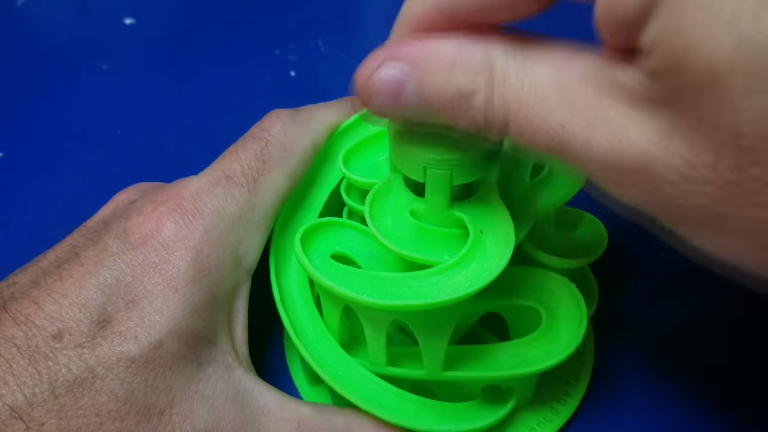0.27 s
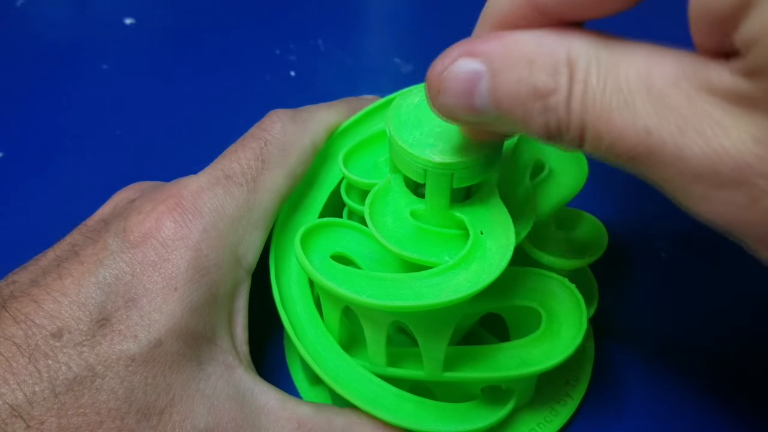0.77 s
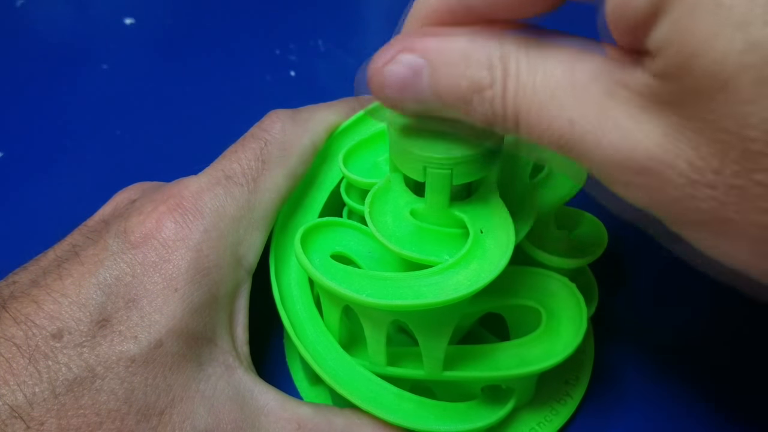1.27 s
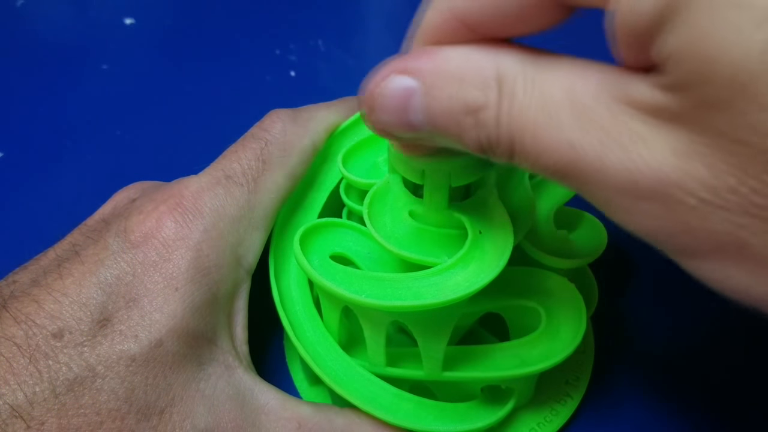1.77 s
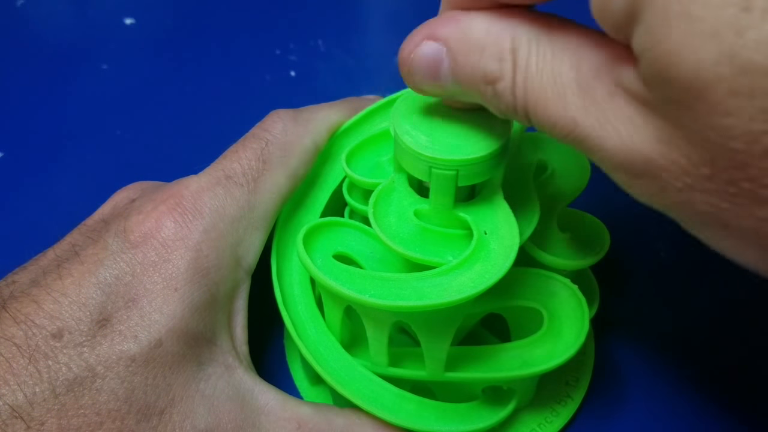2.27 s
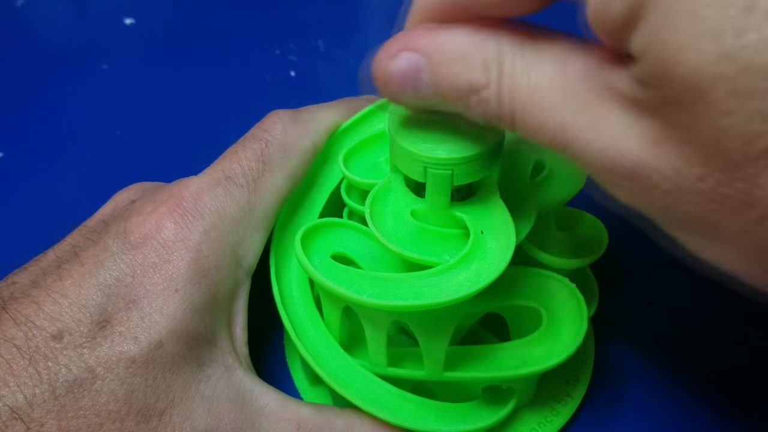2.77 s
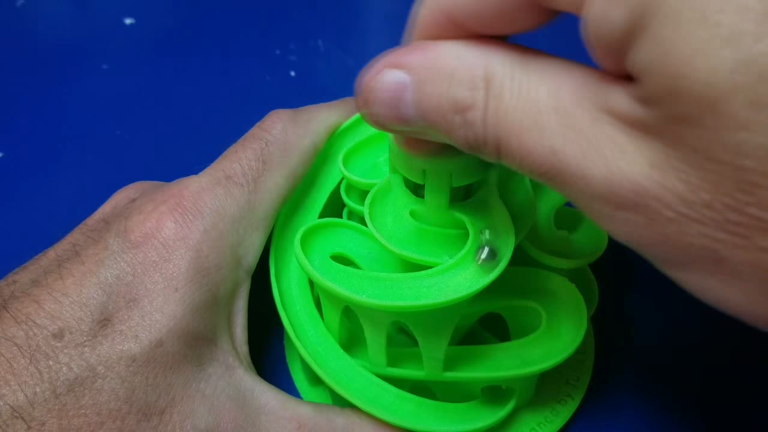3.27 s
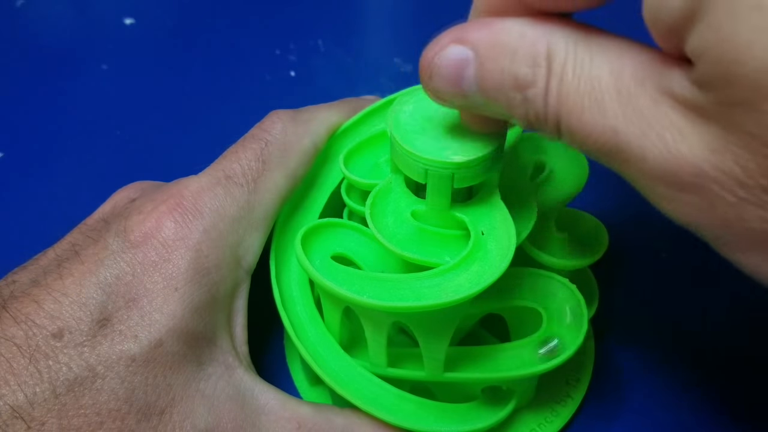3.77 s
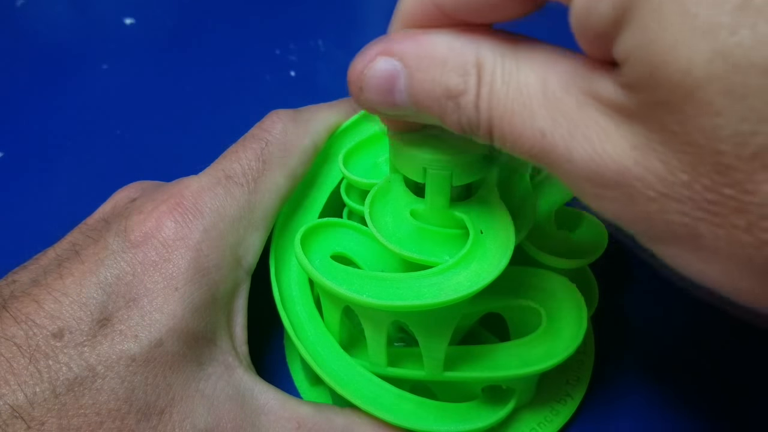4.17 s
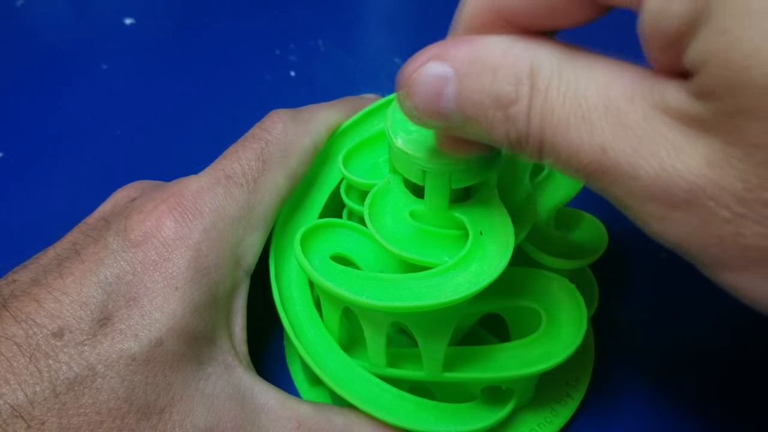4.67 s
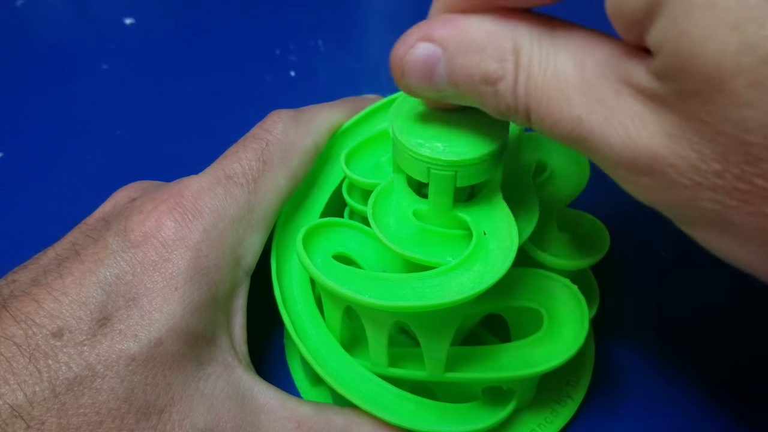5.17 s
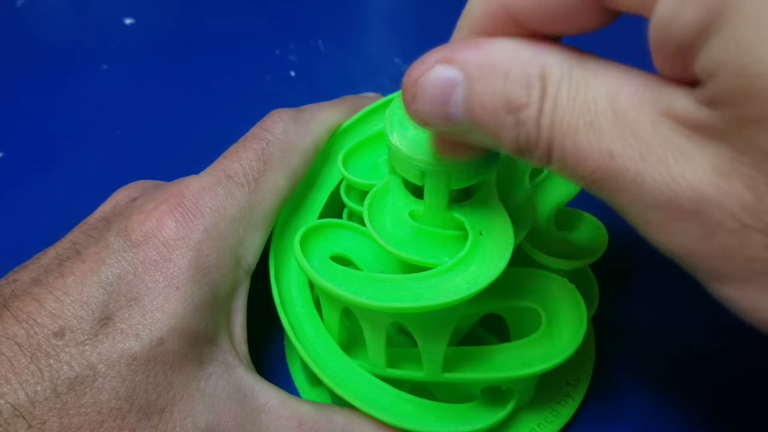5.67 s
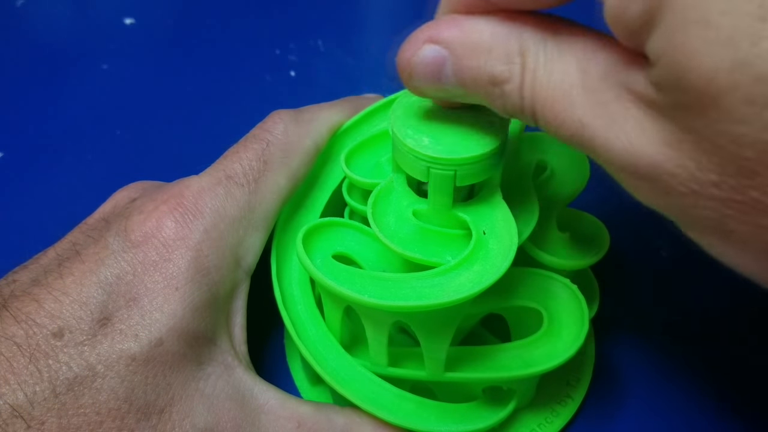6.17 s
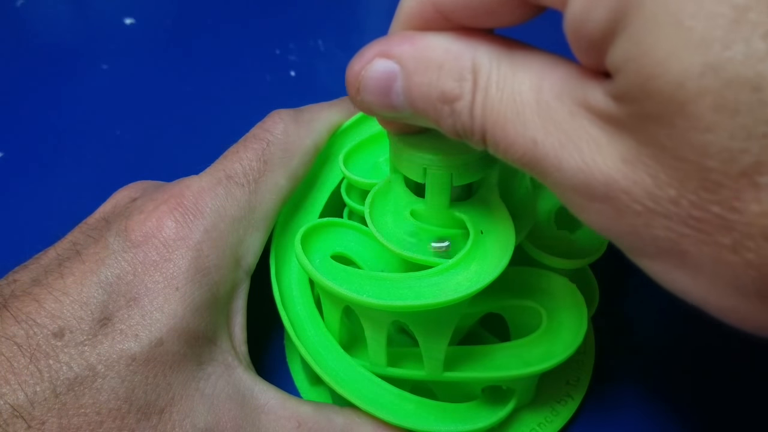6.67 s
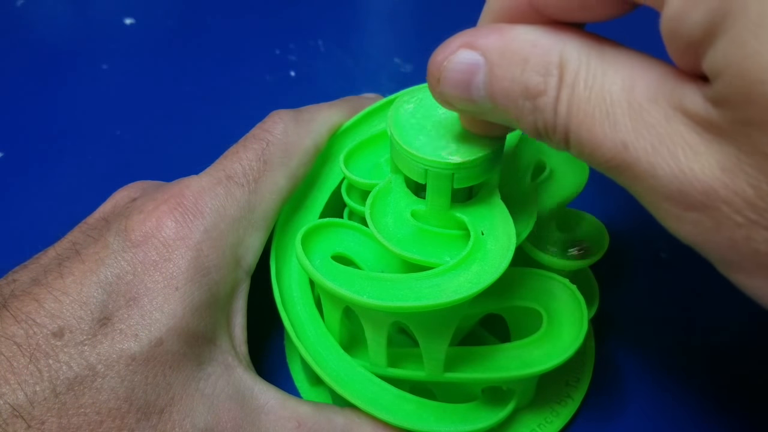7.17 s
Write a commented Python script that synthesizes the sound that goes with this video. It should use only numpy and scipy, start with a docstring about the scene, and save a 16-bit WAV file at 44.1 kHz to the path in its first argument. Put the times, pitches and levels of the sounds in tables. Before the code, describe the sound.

Close up in a quiet, humming room, a hand-turned plastic knob scrapes and clicks. A small steel ball soon ticks down a ridged track and bounces to rest. Irregular snapping clicks and soft table thuds follow, then a second ball runs longer, ending in hard rattling knocks. More rubs and clicks lead to a third ball, still rolling at the end.

```python
"""A small printed plastic marble machine is held on a table in a humming room; its knob is turned by hand.
The lift screw rubs and clicks, then a first steel ball ticks down the ridged track, knocks and bounces to rest.
The screw works on, sticking and snapping free, until a second ball runs down and rattles in the bottom channel.
More rubs and clicks follow, and a third ball closes the scene; soft thuds on the table fall between the runs.
Every contact rings a set of plastic tones plus short noise; ridges and scrapes are streams of tiny contacts."""
import sys
import numpy as np
from scipy import signal
from scipy.fft import rfft, irfft
from scipy.io import wavfile
from scipy.ndimage import uniform_filter1d

SR = 44100
rng = np.random.default_rng(int(sys.argv[2]) if len(sys.argv) > 2 else 0)


def wav_record(signal):
    """Record a signal, one row per channel, as 16-bit PCM in the file named by sys.argv[1]."""
    frames = np.transpose(np.atleast_2d(signal))
    bounded = np.clip(frames, -1, 1)
    # unit amplitude maps onto the largest positive 16-bit level
    quanta = np.round(bounded * 32767).astype(np.int16)
    wavfile.write(sys.argv[1], SR, quanta)


N = 327210
TIME = np.arange(N) / SR  # [s]

# Room air, its relative spectrum: (frequency [Hz], level per Hz [dB])
AIR_SPECTRUM = [(15, -40), (25, -6.5), (229, -6), (335, -5.5), (439, -10), (863, -17.5), (962, -17.5),
                (2110, -24), (2690, -28.5), (4030, -34.5), (5280, -40.5), (16000, -30.5)]
# How alike the air is on the left and right: (frequency [Hz], likeness [0-1])
AIR_LIKENESS = [(60, 0.93), (250, 0.87), (500, 0.72), (1500, 0.039), (12000, 0.04)]
# Tones of the hum, before wavering and panning: (frequency [Hz], level [dB])
HUM_TONES = [(58.3, -64), (119.5, -64), (220.7, -64), (240, -66), (289, -65.5), (380, -70), (436, -64)]
# Colour of the room's reflections: (frequency [Hz], relative level per Hz [dB])
WALL_COLOUR = [(200, 12.5), (3500, 3.5), (8000, 0.5), (16000, 6.5)]

# The toy bumps on the table: (time [s], starting gain [dB])
TABLE_BUMPS = [(1.782, -53), (1.912, -49.5), (2.217, -50.5), (4.827, -52.5), (5.634, -42.5), (6.343, -55)]
# Colour of the dull knock in a bump: (frequency [Hz], relative level per Hz [dB])
BASE_COLOUR = [(30, -35), (60, -17), (100, 5.5), (230, 0), (450, -5.5), (800, -16.5), (1500, -30)]

# The screw rubs in its tower with each push of the fingers: (start [s], length [s], gain [dB])
SCREW_RUBS = [(0.023, 0.08, -54), (0.926, 0.033, -50.5), (1.135, 0.21, -58.5), (1.549, 0.22, -55),
              (1.903, 0.037, -45), (2.075, 0.029, -42.5), (2.368, 0.046, -51.5), (2.476, 0.14, -54),
              (2.593, 0.18, -50), (2.876, 0.064, -54.5), (3.031, 0.075, -56.5), (4.26, 0.41, -62),
              (4.689, 0.097, -55), (4.821, 0.049, -48), (4.887, 0.14, -58.5), (5.12, 0.071, -56),
              (5.646, 0.12, -55.5), (5.845, 0.06, -53), (5.944, 0.081, -55), (6.083, 0.065, -52.5),
              (6.163, 0.13, -55), (6.303, 0.3, -58.5), (6.503, 0.16, -54.5)]
# The screw catches and lets go; low ring and treble are relative to the strength:
# (time [s], strength [dB], low ring [dB], treble [dB])
SCREW_CLICKS = [(0.069, -40, -4, -12), (0.264, -38.5, -12, -23), (0.275, -49, -10, -2.5),
                (0.928, -39.5, -24, -11.5), (1.073, -42, -4.5, -11), (1.108, -57, -1, -3.5),
                (1.249, -29, -18.5, -14.5), (1.256, -42, -15, -6), (1.345, -32.5, -18, -13.5),
                (1.37, -37.5, -23, -15), (1.414, -31.5, -15, -13.5), (1.483, -38, -12.5, -21),
                (1.579, -35.5, -29, -17.5), (1.615, -32, -39, -18), (1.715, -31.5, -20, -18),
                (1.74, -36.5, -19, -16), (1.783, -30.5, -10, -6), (1.785, -34, -10, -5.5),
                (1.911, -24, -18, -12.5), (1.916, -23.5, -27.5, -16), (1.928, -28, -23, -14.5),
                (2.077, -41, -8, -14), (2.087, -27, -25, -14), (2.093, -29.5, -35, -15),
                (2.134, -35.5, -11, -15.5), (2.216, -30.5, -8, -9), (2.233, -30.5, -24, -25),
                (2.269, -31.5, -17, -25), (2.286, -41, -4, -12.5), (2.383, -42, -7, -5.5),
                (2.503, -34, -16.5, -27), (2.525, -26.5, -20, -12), (2.552, -36, -14, -22),
                (2.651, -31, -18, -22), (2.677, -32, -32, -24), (2.686, -26.5, -18, -21),
                (2.729, -40.5, -12, -5.5), (2.92, -52, 6, -4), (3.054, -34.5, -14, -22),
                (3.106, -35, -15, -21), (4.35, -36, -22, -11.5), (4.407, -33, -18, -19),
                (4.468, -39, -20, -17), (4.648, -41, -30, -7.5), (4.725, -36.5, -21, -21),
                (4.827, -28, -12.5, -6.5), (4.928, -50, -18, -7), (4.943, -30.5, -21, -17),
                (5.127, -36.5, -10, -8.5), (5.178, -31.5, -14.5, -18), (5.24, -29.5, -20.5, -17),
                (5.311, -36, -25, -25), (5.376, -32.5, -12.5, -18), (5.383, -28.5, -16, -12.5),
                (5.636, -31, -12, -11.5), (5.763, -38, -5, -14), (5.991, -38.5, -10, -22),
                (6.106, -31.5, -29, -23), (6.214, -29.5, -21, -27), (6.321, -36, -17, -28),
                (6.524, -37, -19, -12), (6.642, -33.5, -15.5, -14.5)]
# Ringing tones of the tower: (frequency [Hz], relative level [dB], time to fade by 60 dB [s])
TOWER_TONES = [(788, 6, 0.027), (1243, 6.5, 0.024), (1400, 10.5, 0.027), (1962, 9.5, 0.033),
               (2394, -1.5, 0.061), (2970, 5.5, 0.038), (3418, 15, 0.027), (3960, -1.5, 0.05)]
# Crowded, quickly fading tower tones between them: (frequency [Hz], relative level per Hz [dB])
TOWER_CROWD = [(400, 0), (900, -10), (1400, 4), (2300, -4), (3400, 0), (5300, -1), (8000, -6.5),
               (11000, -2.5), (15700, -6), (16600, -44)]

# The ball hits the track walls; treble is relative to the strength: (time [s], strength [dB], treble [dB])
WALL_KNOCKS = [(0.491, -25, -31), (0.513, -27, -24), (0.531, -21.5, -20.5), (0.545, -30, -20),
               (0.562, -27.5, -12), (0.578, -35, -18), (0.59, -20, -13.5), (0.604, -32, -9),
               (0.625, -32.5, -5), (0.641, -23, -11), (0.649, -20, -31), (0.659, -27, -6.5),
               (0.671, -28, -6), (0.68, -23.5, -18), (0.691, -31.5, 2), (0.709, -27, -14),
               (0.715, -24, -7.5), (0.725, -32, -9), (0.738, -21.5, -7.5), (0.771, -24.5, -11.5),
               (3.293, -32.5, -15.5), (3.327, -32, -19), (3.334, -29, -22), (3.361, -25, -36),
               (3.376, -27.5, -21), (3.407, -24, -19), (3.419, -26.5, -9), (3.429, -26, -13),
               (3.435, -22.5, -18), (3.44, -23, -17), (3.446, -30, -19), (3.454, -25.5, -9.5),
               (3.594, -36.5, -8), (3.608, -39, -5), (3.624, -36, -12), (3.634, -32, -10),
               (3.646, -27, -12.5), (3.668, -30, -21), (3.702, -25.5, -11), (3.751, -34, -12.5),
               (3.77, -39, -15), (3.822, -22.5, -26), (3.834, -25, -20), (3.883, -21, -21.5),
               (3.911, -20, -35), (3.935, -9, -15), (3.966, -29, -16), (3.974, -21, -9), (3.986, -19, -15),
               (3.993, -18.5, -12.5), (4.016, -34, -16), (4.028, -13.5, -16.5), (4.053, -17, -6),
               (4.065, -16, -26), (4.077, -11, -16.5), (4.112, -10, -26), (4.128, -17.5, -24),
               (4.15, -21, -21), (4.165, -21.5, -10), (4.189, -22.5, -18), (4.209, -22.5, -19.5),
               (6.692, -15.5, -16), (6.722, -29, -3.5), (6.737, -29, -26), (6.817, -31, -17),
               (6.853, -23, -16), (6.872, -22.5, -15), (6.88, -27, -9), (6.919, -25.5, -9.5),
               (6.941, -31, -5.5), (7.029, -26.5, -19), (7.037, -32, -7), (7.19, -26, -23.5),
               (7.216, -28, -16), (7.22, -22, -12.5), (7.32, -27, -18)]
# One curve for each run of the ball, with the hollow note of the stretch of track under it:
# (time [s], rolling gain [dB], note [Hz], relative strength of the note [dB])
BALL_RUNS = [
    [(.12, -65, 1850, 5), (.18, -50.5, 1430, -9), (.37, -52, 1970, -4), (.47, -51.5, 1880, 2.5),
     (.53, -46, 1000, 3), (.6, -44.5, 870, 6.5), (.65, -49, 1550, 9), (.69, -43.5, 1550, 2),
     (.73, -61, 1320, 5.5), (.8, -80, 1360, 6), (.91, -73, 1410, 6)],
    [(3.19, -51, 1500, 3.5), (3.25, -47.5, 1540, -2), (3.32, -47.5, 1980, 5.5), (3.44, -39.5, 1860, -2),
     (3.49, -51.5, 1540, -12), (3.62, -45.5, 1890, -7), (3.7, -47, 1960, 10.5), (3.78, -49, 1910, 7.5),
     (3.82, -50, 1740, -13), (3.89, -47.5, 1830, 9), (3.93, -48, 1890, -15), (4.1, -44, 2090, -16),
     (4.28, -63, 2130, -11.5)],
    [(6.69, -64, 1460, 3), (6.78, -48.5, 1310, -2), (6.85, -72, 1690, -13), (6.94, -55, 2040, 12.5),
     (7.0, -48, 2010, -20), (7.04, -49.5, 1380, -8), (7.11, -49, 1290, 3), (7.175, -66.5, 1170, 6),
     (7.23, -53, 1130, 8), (7.29, -57.5, 1140, 0), (7.34, -47, 1650, -10), (7.42, -50.5, 1710, -7)],
]
# Colour of each run in turn: (relative level of the rattle [dB], relative level of the highest ticks [dB])
RUN_COLOURS = [(1.5, -2.5), (0, -4), (0.5, -4.5)]
# The ball is in the stiff bottom channel: (from [s], to [s])
IN_CHANNEL = (3.8, 4.3)
# Ringing tones of the tracks: (frequency [Hz], relative level [dB], time to fade by 60 dB [s])
TRACK_TONES = [(830, -9, 0.015), (1496, 9, 0.0065), (2000, 1, 0.048), (2480, -4, 0.053), (2864, 5, 0.036),
               (3000, 3, 0.043), (3315, 8.5, 0.03), (3452, 17, 0.029), (3613, 9, 0.022), (5500, 2, 0.0192),
               (6510, 3, 0.02)]
# Crowded, quickly fading track tones between them: (frequency [Hz], relative level per Hz [dB])
TRACK_CROWD = [(400, -16), (900, -22), (1400, -9), (2300, -10.5), (3400, -1.5), (4600, -5), (6400, -8),
               (7800, -10.5), (12500, -10.5), (15700, -16.5), (16600, -49)]

# The toy is nearer the left microphone, and sounds radiate by pitch:
# (frequency [Hz], phase by which the left leads [radians])
LEFT_LEAD_CURVE = [(500, .1), (1850, 1.59), (3500, 1.11), (5000, 3.1), (16000, 7.5)]
# Low body, middle ring and treble of a contact: (lowest frequency [Hz], highest frequency [Hz])
CONTACT_RANGES = [(350, 2400), (2400, 4400), (4400, 17000)]

RING_SAMPLES, ATTACK_SAMPLES = 3072, 353  # whole ring of a contact, and its opening

# The loose screw rebounds: mean gap [s], loss per rebound [dB], how much duller it is [dB]
REBOUND_S, REBOUND_LOSS_DB, REBOUND_DULL_DB = .008, 10.5, 5

# The first ball bounces to rest: start [s], first gap [s], each gap over the one before
SETTLE_S, SETTLE_GAP_S, SETTLE_SHRINK = .7995, .0215, .9
# First strength, loss per bounce and relative treble [dB]
SETTLE_DB, SETTLE_LOSS_DB, SETTLE_SNAP_DB = -25, 2.5, -12.5

# A ball starts slowly and dully over single ridges; as it gathers speed they merge and it brightens
SLOW_TREBLE_DB, GATHER_S = -6, 0.24
SLOW_RIDGES_PER_S, FAST_RIDGES_PER_S = 140, 420
# The ball presses unevenly on the track
JOLT_DB, JOLTS_PER_S = 2.0, 45
# The note has a weaker overtone above it
OVERTONE_RATIO, OVERTONE_DB = 1.5, -7
# The stiff channel gives knocks less body than the open tracks: most body allowed [dB]
CHANNEL_BODY_DB, TRACK_BODY_DB = -45.5, -34.5


def from_db(db):
    """Turn decibels into a plain multiplier."""
    return 10 ** (np.asarray(db) / 20)


def rms_one(x):
    """Scale a sound to an average (rms) strength of 1."""
    return x / np.sqrt(np.mean(x ** 2) + 1e-20)


def in_time(rows):
    """Read the columns of a curve at every sample."""
    s, *columns = np.transpose(rows)
    return [np.interp(TIME, s, column) for column in columns]


def at_hz(points, hz):
    """Read a curve over frequency, with even steps per octave."""
    known_hz, values = np.transpose(points)
    return np.interp(np.log(hz + 0.0011), np.log(known_hz), values)


def band(x, edges):
    """Keep only the frequencies between two edges [Hz]."""
    return signal.sosfilt(signal.butter(4, edges, "band", fs=SR, output="sos"), x)


def resonate(x, hz, sharpness):
    """Let one narrow range of frequencies ring out."""
    b, a = signal.iirpeak(hz, sharpness, fs=SR)
    return signal.lfilter(b, a, x)


def coloured(spectrum, shape):
    """Noise shaped to a given spectrum, with average strength 1."""
    hz = np.fft.rfftfreq(shape[-1], 1 / SR)
    noise = rfft(rng.standard_normal(shape))
    return rms_one(irfft(noise * from_db(at_hz(spectrum, hz)), shape[-1]))


def drift(rate):
    """Slow random wandering: straight lines between 'rate' random points per second, average strength 1."""
    points = rng.standard_normal(2000)
    return rms_one(np.interp(TIME * rate, np.arange(len(points)), points))


def pan(left_db):
    """Left and right gains that make the left louder by left_db."""
    return from_db(np.array([[left_db], [-left_db]]) / 2)


def plastic(tones, crowd_colour, crowd_db, crowd_t60, rise_s, vary_db, detune, count, diffuse_hz=4000):
    """Stereo rings of the shell tapped at 'count' spots, each favouring other tones, slightly retuned."""
    t = np.arange(RING_SAMPLES) / SR
    hz, level_db, t60 = np.transpose(tones)
    spot_hz = hz * np.exp(detune * rng.standard_normal((count, len(hz))))
    fading = from_db(level_db[:, None] - 60 * t / t60[:, None])
    rings = np.exp(2j * np.pi * spot_hz[..., None] * t) * fading
    strength = from_db(vary_db * rng.standard_normal((count, 1, len(hz))))

    # The right microphone is farther away; higher tones reach the two sides less alike
    phase = rng.uniform(0, 2 * np.pi, (count, 1, len(hz)))
    phase = phase + (hz / diffuse_hz) ** 2 * rng.standard_normal((count, 2, len(hz)))
    phase[:, 1] -= at_hz(LEFT_LEAD_CURVE, hz)
    clear_tones = ((strength * np.exp(1j * phase)) @ rings).imag

    # The crowded tones are noise, also less alike at the two sides as they get higher
    bins_hz = np.fft.rfftfreq(RING_SAMPLES, 1 / SR)
    alike = np.exp(-(bins_hz / diffuse_hz) ** 2 / 2)
    left, other = rfft(coloured(crowd_colour, (2, count, RING_SAMPLES)))
    delayed_left = left * np.exp(-1j * at_hz(LEFT_LEAD_CURVE, bins_hz))
    right = alike * delayed_left + np.sqrt(1 - alike ** 2) * other
    crowd = irfft(np.stack([left, right], axis=1)) * from_db(crowd_db - 60 * t / crowd_t60)
    return (clear_tones + crowd) * (1 - np.exp(-t / rise_s))


def strike(contacts, responses, left_db, ring_db, treble_db):
    """Each contact rings the shell with its own share of body, ring and treble snap."""
    out = np.zeros((2, N + RING_SAMPLES))
    times, strength_db, body_db, snap_db = np.transpose(contacts)
    levels = strength_db + body_db, strength_db + ring_db, strength_db + snap_db + treble_db
    hits = 0
    for edges, level_db, side_db in zip(CONTACT_RANGES, levels, left_db):
        part = band(responses, edges)
        attack = np.sqrt(np.mean(part[..., :ATTACK_SAMPLES] ** 2, axis=(1, 2)))
        hits = hits + part * (from_db(level_db) / attack)[:, None, None] * pan(side_db)
    for s, hit in zip(times, hits):
        start = int(s * SR)
        out[:, start:start + RING_SAMPLES] += hit
    return out[:, :N]


def chatter(responses, per_s, uneven, spread_db):
    """A stream of tiny contacts at random spots of the shell; average strength 1."""
    responses = responses / responses.std(axis=(1, 2), keepdims=True)
    rate = per_s * np.ones(N)
    draws = rng.standard_normal((12000, 2))
    # A contact falls each time the running count of the rate passes the next uneven step
    steps = np.cumsum(np.exp(uneven * draws[:, 0]))
    at = np.searchsorted(np.cumsum(rate) / SR, steps)
    sizes = from_db(spread_db * np.clip(draws[:, 1], -2, 2))
    spots = rng.integers(0, len(responses), len(at))
    out = np.zeros((2, N + RING_SAMPLES))
    for start, size, spot in zip(at[at < N], sizes, spots):
        # Denser contacts are each made weaker
        out[:, start:start + RING_SAMPLES] += size / np.sqrt(rate[start]) * responses[spot]
    return rms_one(out[:, :N])


def background(air_db=-54.5, waver=0.43, wander=1.6):
    """Room air is noise, alike on both sides in the bass; the hum is tones wavering in level and phase."""
    alike = np.clip(at_hz(AIR_LIKENESS, np.fft.rfftfreq(N, 1 / SR)), 0, 1)
    mid, side = rfft(coloured(AIR_SPECTRUM, (2, N)))
    both_sides = np.sqrt(1 + alike) * mid + np.sqrt(1 - alike) * side * [[1], [-1]]
    air = rms_one(band(irfft(both_sides, N), (32, 16000)))
    hum = np.zeros(N)
    for hz, level_db in HUM_TONES:
        loudness = from_db(level_db) * np.sqrt(2) * (1 + waver * drift(11))
        hum += loudness * np.sin(2 * np.pi * hz * TIME + wander * drift(12))
    return (from_db(air_db) * air + hum) * pan(-1.45)


def room(x, wet_db=-9, t60=0.17, first_s=0.006):
    """The table and walls scatter the sound back as a short fading tail of noise."""
    t = np.arange(SR // 2) / SR
    tail = coloured(WALL_COLOUR, (2, len(t))) * from_db(-60 * t / t60) * (t > first_s)
    tail = tail / np.sqrt(np.sum(tail ** 2, axis=1, keepdims=True))
    return from_db(wet_db) * signal.fftconvolve(x, tail, axes=1)[:, :N]


def bumps(thud_hz=112, t60=0.16, rise_s=0.001, body_db=6.0):
    """The base thuds softly on the table: one low note with a dull knock of noise, both dying away."""
    out = np.zeros(N)
    t = np.arange(4 * RING_SAMPLES) / SR
    for s, level_db in TABLE_BUMPS:
        thud = np.sin(2 * np.pi * thud_hz * t) + from_db(body_db) * coloured(BASE_COLOUR, t.shape)
        start = int(s * SR)
        out[start:start + len(t)] += from_db(level_db - 60 * t / t60) * thud * (1 - np.exp(-t / rise_s))
    return out


def rubbing(fade_share=0.11):
    """Gain of the rubs: each swells and fades over a share of its length, holding in between."""
    gain = np.zeros(N)
    for start, length, level_db in SCREW_RUBS:
        part = (TIME - start) / length
        gain += from_db(level_db) * np.clip(np.minimum(part, 1 - part) / fade_share, 0, 1)
    return gain


def rebounds(count=2):
    """The loose screw makes softer, duller contacts at uneven gaps after each click, as click rows."""
    delays = np.cumsum(REBOUND_S * rng.uniform(.5, 1.5, (len(SCREW_CLICKS), count)), axis=1)
    rows = []
    for (s, strength_db, body_db, snap_db), row in zip(SCREW_CLICKS, delays):
        for k, delay in enumerate(row, 1):
            softer_db = strength_db - REBOUND_LOSS_DB * k
            rows.append((s + delay, softer_db, body_db, snap_db - REBOUND_DULL_DB))
    return rows


def pings(soft_hz=12000, hard_hz=15300, soft_db=-46, hard_db=-32, width_hz=1700, t60=0.027,
          level_db=18.0, snap_share=2.6):
    """A thin ping tops each click: a harder snap is a shorter contact, so its ping is higher and stronger."""
    out = np.zeros((2, N + RING_SAMPLES))
    t = np.arange(RING_SAMPLES) / SR
    for s, strength_db, _, snap_db in SCREW_CLICKS:
        treble_db = strength_db + snap_db
        hz = np.interp(treble_db, [soft_db, hard_db], [soft_hz, hard_hz])
        burst = rng.standard_normal((2, RING_SAMPLES)) * from_db(-60 * t / t60)
        ping = resonate(burst, hz, hz / width_hz)
        gain = from_db(treble_db + level_db + snap_share * snap_db)
        start = int(s * SR)
        out[:, start:start + RING_SAMPLES] += gain * ping / ping[:, :ATTACK_SAMPLES].std()
    return out[:, :N]


def knob(idle_db=-68):
    """The screw sticks and lets go with a click; it scrapes in small slips, faintly even between pushes."""
    contacts = list(SCREW_CLICKS) + rebounds()
    snaps = plastic(TOWER_TONES, TOWER_CROWD, crowd_db=15.5, crowd_t60=0.027, rise_s=0.00085,
                    vary_db=3.5, detune=0.048, count=len(contacts))
    slips = plastic(TOWER_TONES, TOWER_CROWD, crowd_db=20.0, crowd_t60=0.017, rise_s=0.0009,
                    vary_db=4.0, detune=0.061, count=40)
    scrape = chatter(slips, per_s=230, uneven=.6, spread_db=3.5)
    # Slips are softer than clicks, so their treble is dulled
    scrape = rms_one(signal.sosfilt(signal.butter(1, 4200, fs=SR, output="sos"), scrape))
    sliding = rubbing() + from_db(idle_db)
    clicks = strike(contacts, snaps, left_db=(3.5, 2.8, 1.5), ring_db=-11.5, treble_db=-2.2)
    return clicks + pings() * pan(1.2) + sliding * scrape * pan(2.6)


def rolling_controls():
    """Gain, track note, its strength and time since the ball's release; the gain is zero between runs."""
    gain, note_db, age_s = np.zeros(N), np.zeros(N), np.zeros(N)
    hz = np.full(N, float(BALL_RUNS[0][0][2]))
    for run in BALL_RUNS:
        on = (TIME >= run[0][0]) & (TIME <= run[-1][0])
        level_db, hz[on], note_db[on] = (column[on] for column in in_time(run))
        gain[on] = from_db(level_db)
        age_s[on] = TIME[on] - run[0][0]
    return gain, hz, note_db, age_s


def hollow(x, width_hz, ratio=1):
    """The track resonates, changing in pitch and strength as the ball travels."""
    _, hz, note_db, _ = rolling_controls()
    r = np.exp(-np.pi * width_hz / SR)
    feed = np.array([1, 0, -1]) * (1 - r * r) / 2
    out, state = np.zeros((2, N)), np.zeros((2, 2))
    for i in range(0, N, 256):  # retune every 256 samples
        block = slice(i, i + 256)
        poles = [1, -2 * r * np.cos(2 * np.pi * ratio * hz[i] / SR), r * r]
        out[:, block], state = signal.lfilter(feed, poles, x[:, block] + 1e-18, zi=state)
    return out * from_db(note_db)


def lull(knocks, lead_s, depth_db):
    """The ball is in the air before each knock, so this gain sinks around that moment."""
    quiet = np.zeros(N)
    for s, *_ in knocks:
        first = max(int((s - lead_s) * SR), 0)
        quiet[first:int(s * SR) + ATTACK_SAMPLES // 2] = 1
    return from_db(depth_db * uniform_filter1d(quiet, ATTACK_SAMPLES // 2))


def ball_rolling(shell_hz=2020, shell_db=-9):
    """The ball ticks over ridges, sounding the track's note and overtone; at speed it also skips brightly."""
    gain, _, _, age_s = rolling_controls()
    slow = np.exp(-(age_s / GATHER_S) ** 2)  # 1 at release, towards 0 at speed
    run = np.searchsorted([points[-1][0] for points in BALL_RUNS[:-1]], TIME)
    rattle_db, top_db = np.array(RUN_COLOURS)[run].T

    dry_taps = plastic(TRACK_TONES, TRACK_CROWD, crowd_db=28.5, crowd_t60=0.0056, rise_s=0.00004,
                       vary_db=5, detune=0.068, count=40)
    ringing_taps = plastic(TRACK_TONES, TRACK_CROWD, crowd_db=16.0, crowd_t60=0.023, rise_s=0.00004,
                           vary_db=3, detune=0.065, count=40)
    ridges_per_s = SLOW_RIDGES_PER_S * slow + FAST_RIDGES_PER_S * (1 - slow)
    ridges = chatter(dry_taps, per_s=ridges_per_s, uneven=0.13, spread_db=3.5)
    skips = chatter(ringing_taps, per_s=100, uneven=.2, spread_db=6.0) * (1 - slow)

    # Low part: the track's note, its overtone, plain body and a fixed shell tone
    drumming = ridges + from_db(-0.5) * skips
    body = rms_one(band(drumming, (700, 2700)))
    note = rms_one(hollow(body, width_hz=150))
    overtone = rms_one(hollow(drumming, width_hz=70, ratio=OVERTONE_RATIO))
    shell = rms_one(resonate(drumming, shell_hz, 16)) * (1 - slow)
    rumble = from_db(-4.0) * (note + from_db(OVERTONE_DB) * overtone)
    rumble = rumble + from_db(-2.5) * body + from_db(shell_db) * shell

    # Middle and high parts
    rattle = rms_one(band(drumming, (2600, 3950))) * from_db(rattle_db)
    bright = skips + from_db(-6.5) * ridges
    top_ticks = from_db(top_db) * rms_one(band(bright, (7400, 16000)))
    ticks = rms_one(band(bright, (4400, 7300))) + top_ticks
    treble = ticks * from_db(SLOW_TREBLE_DB * slow)

    jolts = from_db(JOLT_DB * drift(JOLTS_PER_S))
    mix = rumble * pan(2.6) + from_db(-3.0) * rattle * pan(4.3) + from_db(-8.0) * treble * pan(0.63)
    return gain * jolts * mix


def settling(count=6):
    """The first ball's bounces come ever sooner and softer, as knock rows."""
    k = np.arange(count)
    gaps = SETTLE_GAP_S * SETTLE_SHRINK ** k
    times = SETTLE_S + np.cumsum(gaps) - gaps
    levels_db = SETTLE_DB - SETTLE_LOSS_DB * k
    return [(s, level_db, SETTLE_SNAP_DB) for s, level_db in zip(times, levels_db)]


def ball_knocks(body_db=-16.5):
    """Steel hits the walls; harder contacts are shorter, so past a limit only ring and snap grow, not body."""
    times, strength_db, snap_db = np.transpose(list(WALL_KNOCKS) + settling())
    in_channel = (times > IN_CHANNEL[0]) & (times < IN_CHANNEL[1])
    most_body_db = np.where(in_channel, CHANNEL_BODY_DB, TRACK_BODY_DB)
    limited_body_db = np.minimum(body_db, most_body_db - strength_db)
    contacts = np.transpose([times, strength_db, limited_body_db, snap_db])
    taps = plastic(TRACK_TONES, TRACK_CROWD, crowd_db=11.5, crowd_t60=0.033, rise_s=0.00037,
                   vary_db=4.0, detune=0.027, count=len(contacts))
    knocks = strike(contacts, taps, left_db=(4, 2.5, .7), ring_db=-11, treble_db=-1.5)
    return knocks + from_db(-1.0) * hollow(knocks, width_hz=130)


def scene():
    """The toy, its reflections in the room, and the background; the rolling dips around each wall knock."""
    rolling = ball_rolling() * lull(WALL_KNOCKS, lead_s=0.0058, depth_db=-7.5)
    toy = ball_knocks() + rolling + knob() + bumps()
    return toy + room(toy) + background()


def record(dry):
    """Everything above 16.5 kHz is cut steeply."""
    return signal.sosfilt(signal.ellip(10, .1, 80, 16500, fs=SR, output="sos"), dry)


dry = scene()
out = record(dry)
wav_record(out)
```